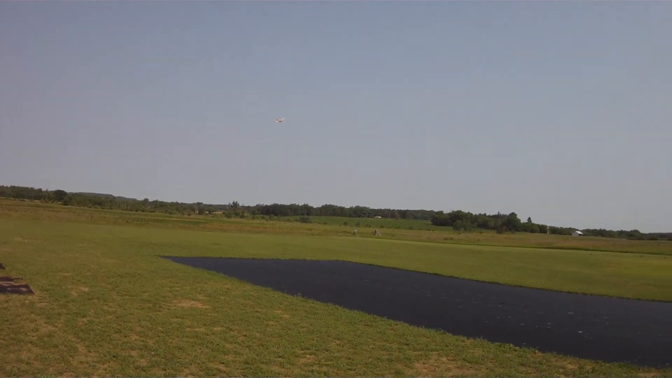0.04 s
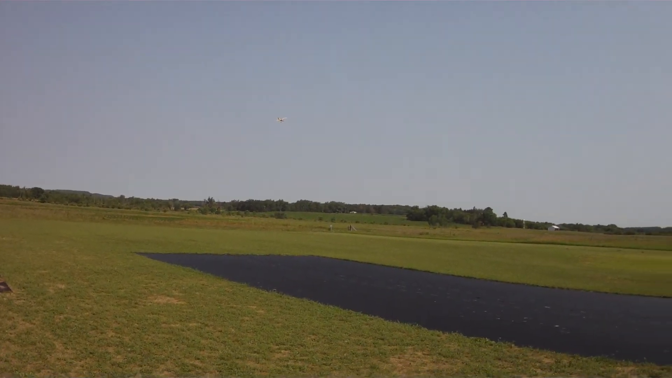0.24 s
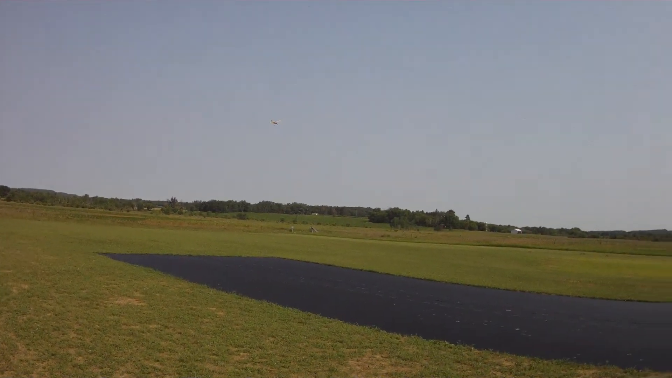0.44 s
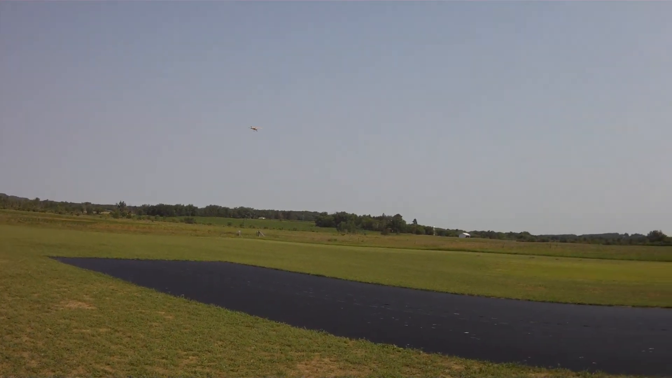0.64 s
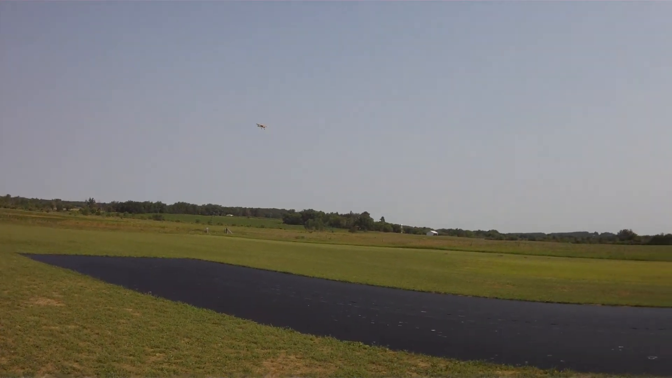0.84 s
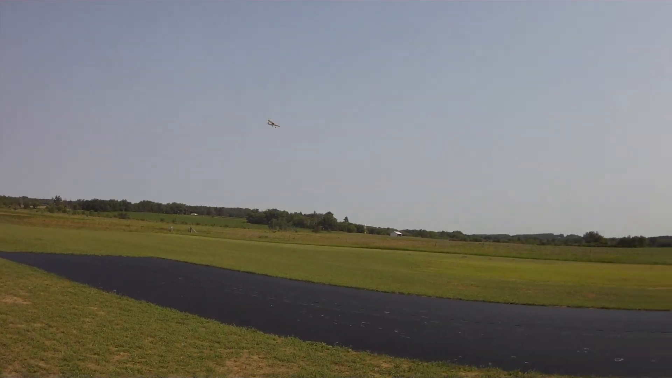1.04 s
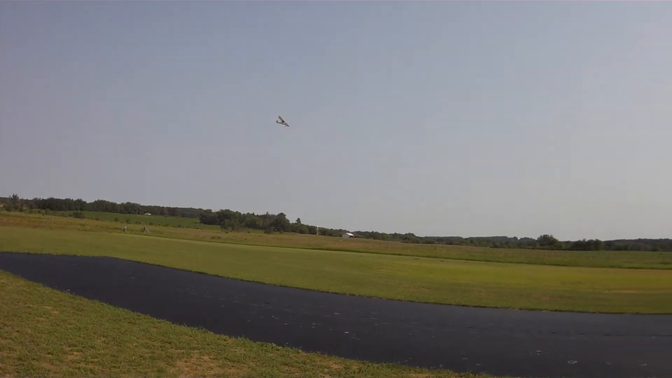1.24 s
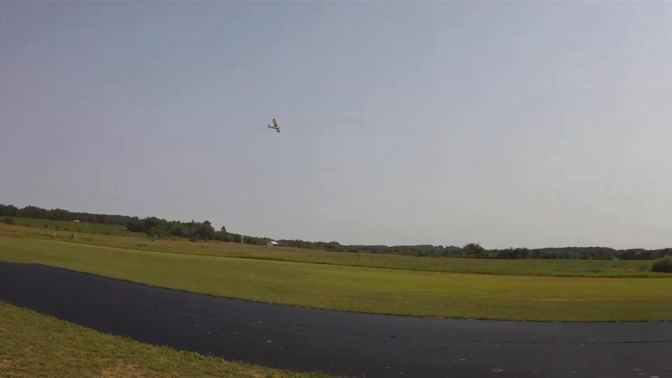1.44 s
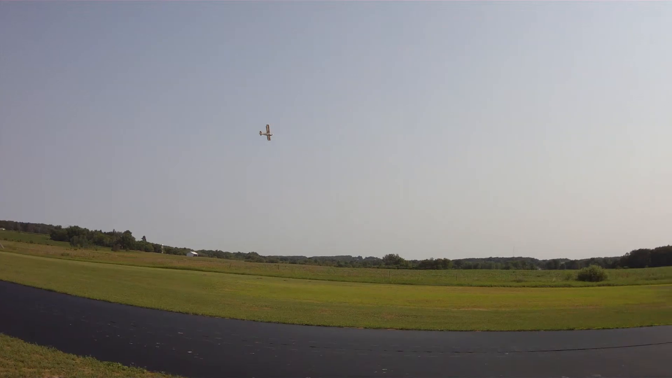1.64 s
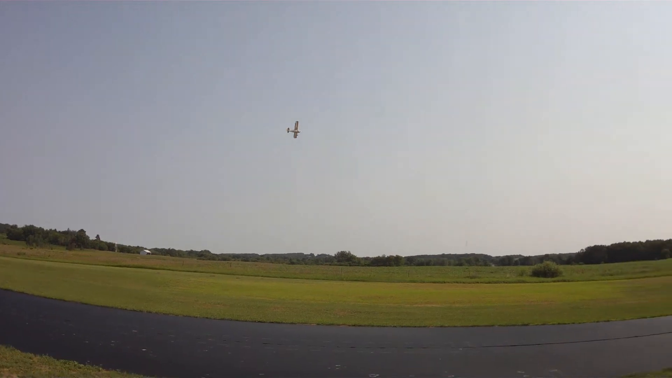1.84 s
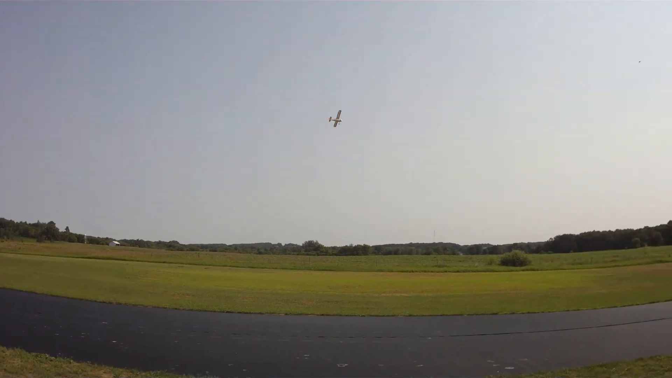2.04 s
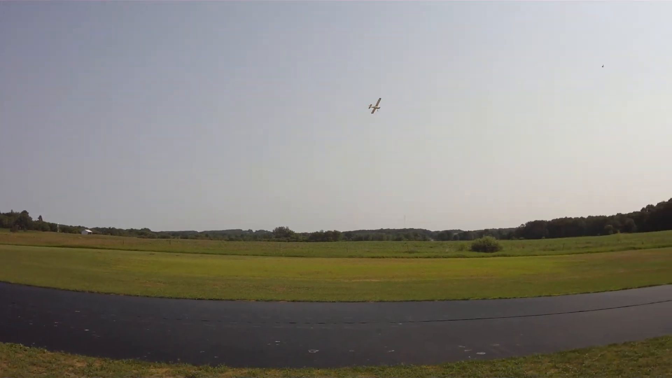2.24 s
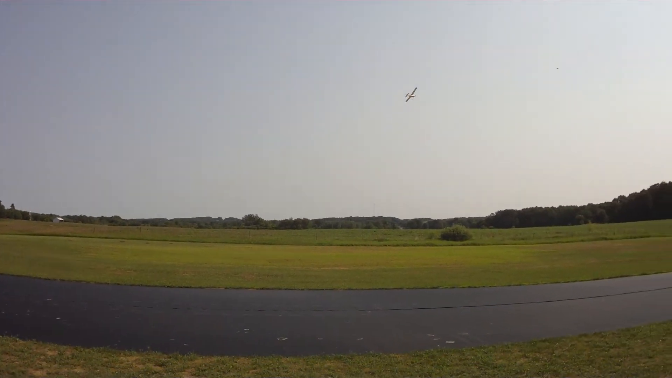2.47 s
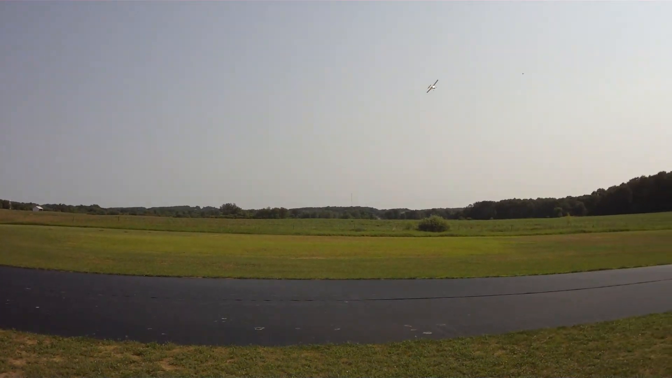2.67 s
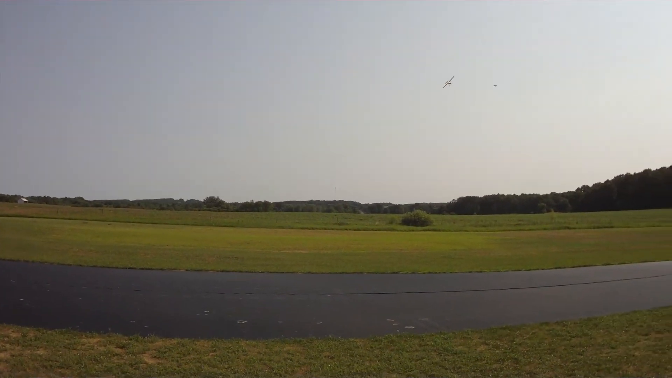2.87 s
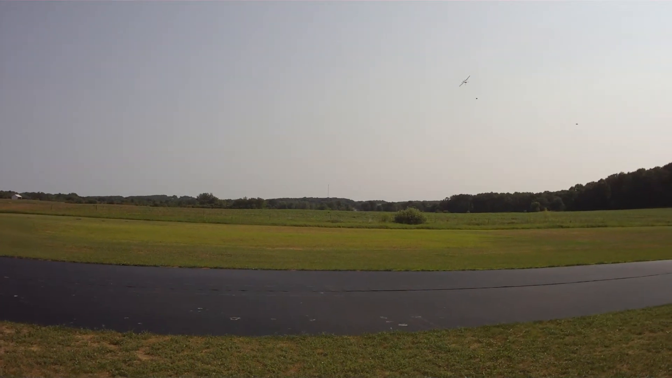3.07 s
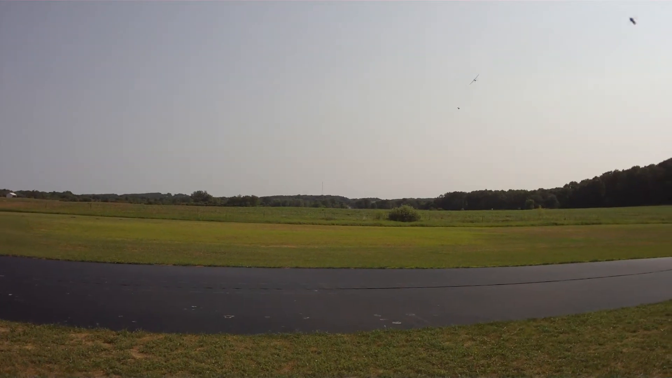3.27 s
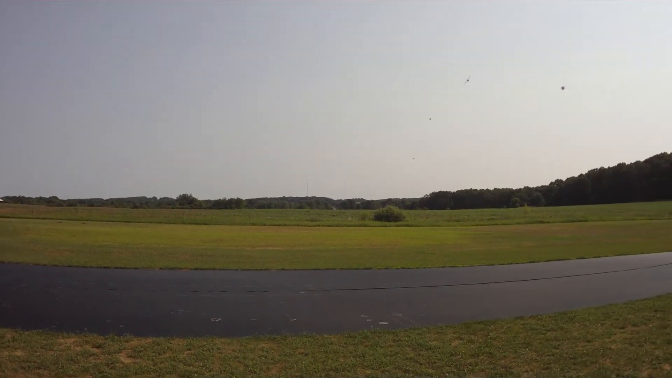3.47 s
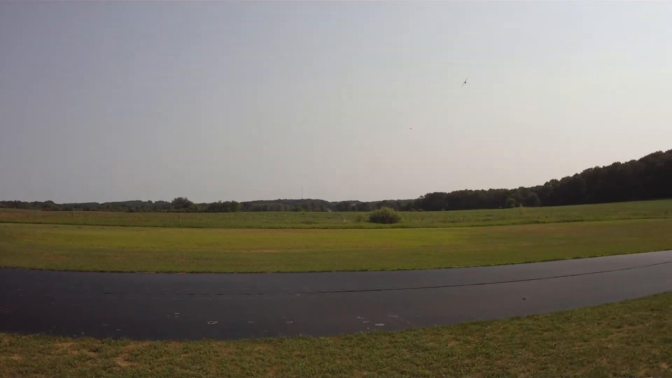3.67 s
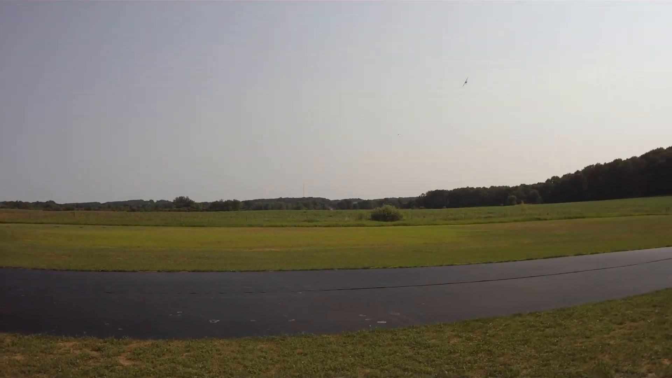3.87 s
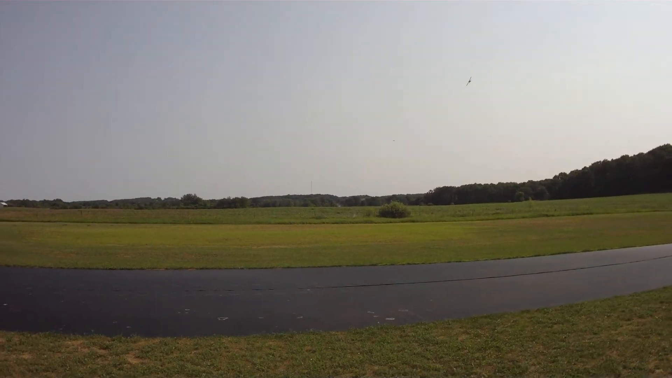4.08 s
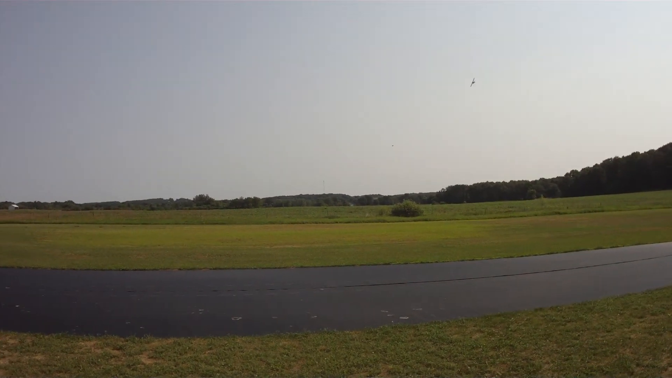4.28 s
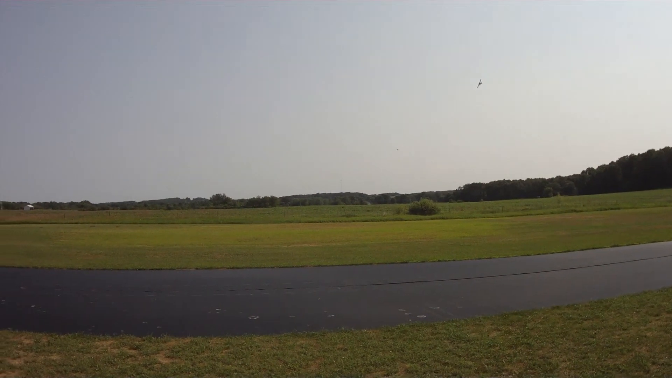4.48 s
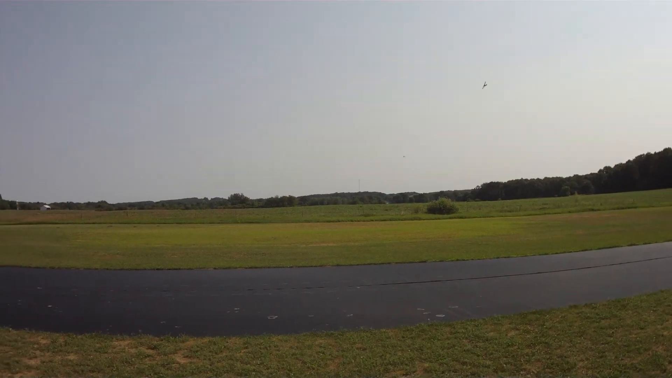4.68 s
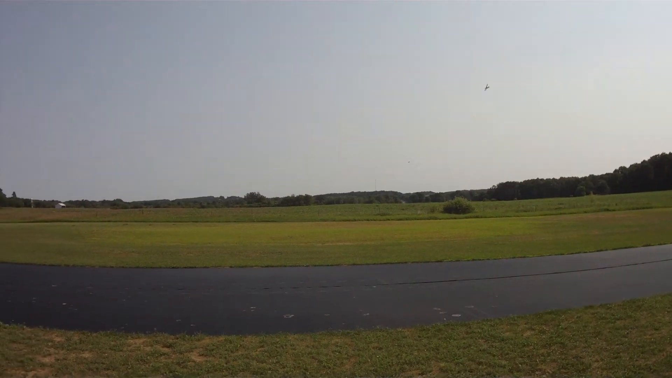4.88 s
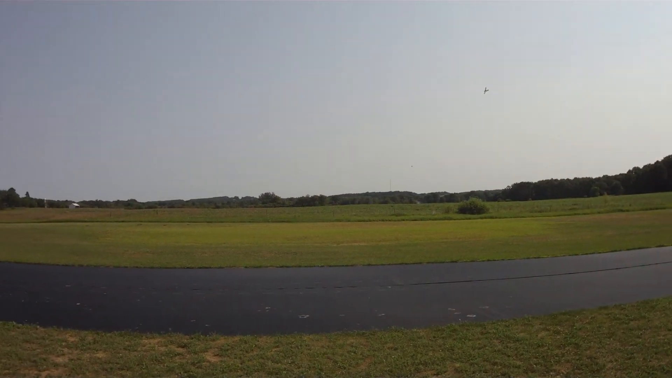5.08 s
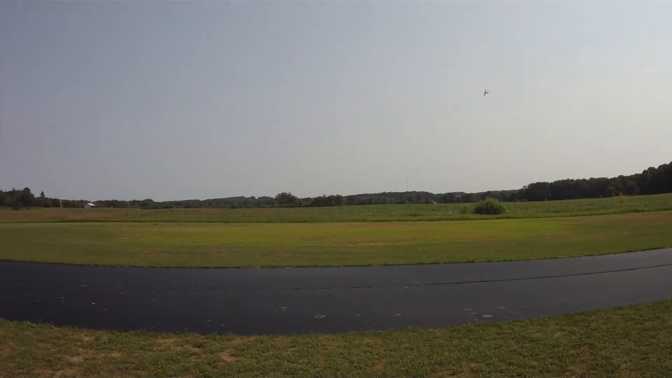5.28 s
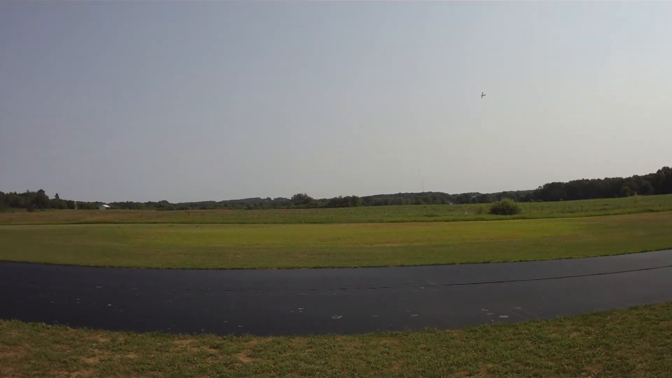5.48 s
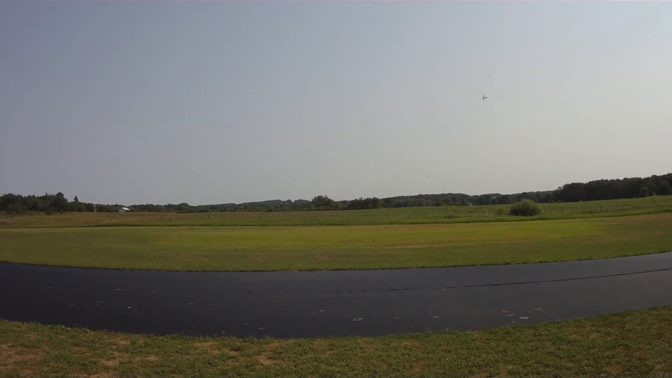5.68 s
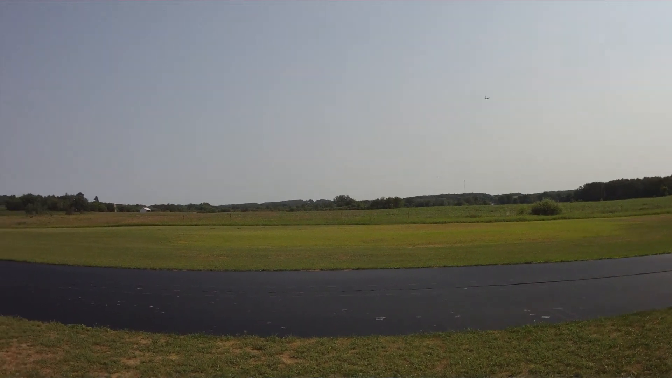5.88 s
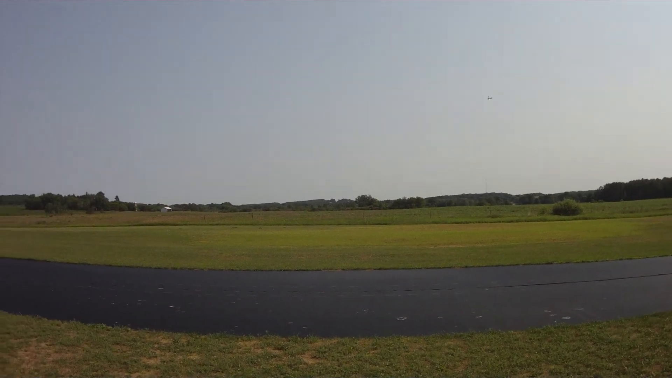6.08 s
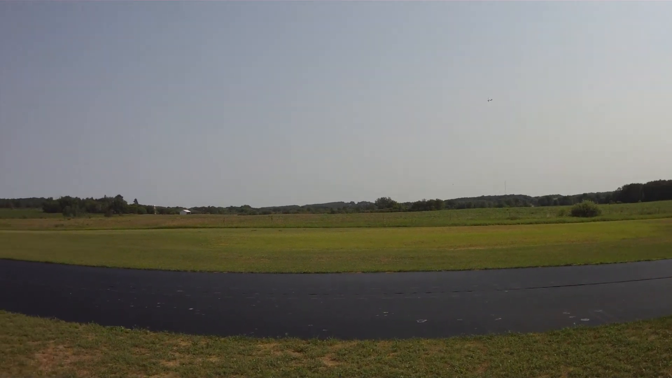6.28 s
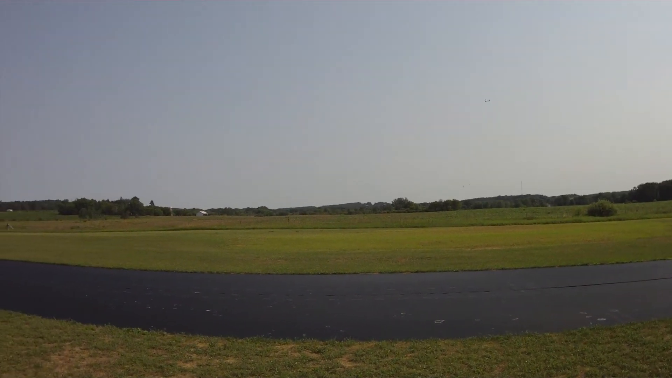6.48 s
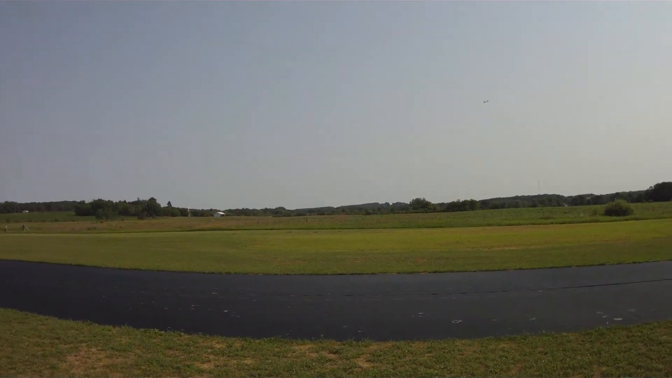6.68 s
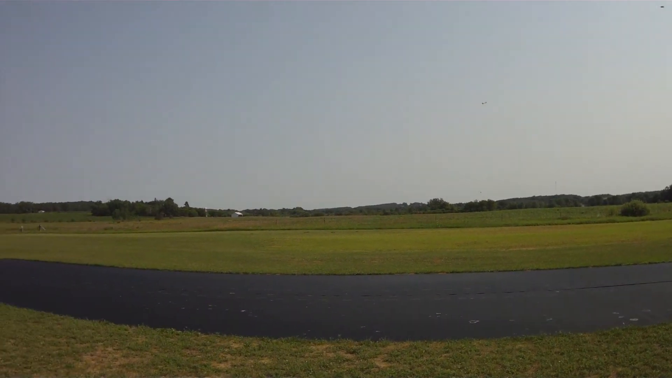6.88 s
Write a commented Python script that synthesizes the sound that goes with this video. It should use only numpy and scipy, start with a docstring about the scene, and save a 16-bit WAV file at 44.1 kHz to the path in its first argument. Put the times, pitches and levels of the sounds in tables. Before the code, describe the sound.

Rough sputtering model airplane drone rises in pitch and loudness, peaks bright and buzzy, then recedes over a breezy field with wind bumps and faint birds.

```python
"""A model airplane's two-stroke glow engine starts rich and stumbling, with a few bird notes over a breezy meadow.
It cleans up at full throttle and swells, pulses driving a muffler and a bright rasp over propeller tone and wash.
The note peaks, then drops as the plane banks away, coloured throughout by a moving echo off the ground.
Later, puffs and sharp eddies of wind crowd the microphone and bent whistles of birds return."""
import sys
import numpy as np
from scipy import signal
from scipy.fft import rfft, irfft
from scipy.io import wavfile
from scipy.ndimage import map_coordinates

SR = 44100
rng = np.random.default_rng(int(sys.argv[2]) if len(sys.argv) > 2 else 0)


def wav_out(sig):
    """Save sig, one row per channel (or a flat mono array), as 16-bit PCM at SR to the path in sys.argv[1]."""
    wavfile.write(sys.argv[1], SR, np.round(np.clip(np.atleast_2d(sig).T, -1, 1) * 32767).astype(np.int16))


N = 305172
TIME = np.arange(N) / SR


def amp(db):
    """Decibels to gain."""
    return 10 ** (np.asarray(db) / 20)


def evened(x):
    """Scales to rms 1."""
    return x / np.sqrt(np.mean(x ** 2) + 1e-20)


def curves(rows):
    """The columns of a table, joined by straight lines in time."""
    s, *columns = np.transpose(rows)
    return [np.interp(TIME, s, column) for column in columns]


def drift(rate_hz):
    """Random wander of rms 1, its spectrum fading smoothly above rate_hz."""
    hz = np.fft.rfftfreq(N, 1 / SR)
    spectrum = rfft(rng.standard_normal(N)) * np.exp(-(hz / rate_hz) ** 2)
    return evened(irfft(spectrum * (hz > 0), N))


def colour(x, spectrum, size=2048):
    """Causal minimum-phase filter with the given (f/Hz, level/dB) shape."""
    f, db = np.transpose(spectrum)
    hz = abs(np.fft.fftfreq(size, 1 / SR))
    log_gain = np.log(amp(np.interp(np.log(hz + 1), np.log(f), db)))
    taps = np.fft.ifft(np.exp(np.conj(signal.hilbert(log_gain)))).real
    return signal.oaconvolve(x, taps[:size // 2])[:N]


def at_level(x, db, size=4001):
    """Rides a sound to the running rms level db."""
    window = signal.windows.hann(size)
    power = signal.oaconvolve(x ** 2, window / window.sum(), "same")
    return x * amp(db) / np.sqrt(abs(power) + 1e-12)


def swells(rows):
    """Gain of bell-shaped swells, each (t/s, half width/s, level/dB); their powers add."""
    powers = (amp(2 * db) * np.exp(-2 * ((TIME - s) / width) ** 2) for s, width, db in rows)
    return np.sqrt(sum(powers))


def resonate(x, hz, width_hz):
    """A resonance of gain 1 that follows the curve hz, made by shifting it down to a one-pole low-pass."""
    turn = np.exp(2j * np.pi * np.cumsum(hz) / SR)
    r = np.exp(-np.pi * width_hz / SR)
    return 2 * (turn * signal.lfilter([1 - r], [1, -r], x / turn)).real


IDLE_HZ, CLEAN_HZ = 159, 177  # firing rates where the mixture is fully rich, and where it has cleaned up


def richness(speed_hz):
    """Fuel mixture: 1 at idle, 0 once the engine has cleaned up."""
    return np.clip((CLEAN_HZ - speed_hz) / (CLEAN_HZ - IDLE_HZ), 0, 1)


# Missed firings: t/s, loss level/dB
MISSED_FIRINGS = [(.074, 5), (.152, 6), (.519, 5), (.526, 5), (.533, 12), (.688, 1), (.84, 7), (.962, 2),
                  (1.062, 4)]
RICH_DB, LEAN_DB = 7, -0.5  # extra loss of a weak firing at full richness, and its loss once clean


def firings(turns, speed_hz, uneven_db, jitter):
    """Strength of the current firing, and the phase in turns from its crack; rich charges burn unevenly."""
    number = np.round(turns).astype(int)
    when = np.interp(np.arange(number[-1] + 1), turns, TIME)
    scatter, late, skip = rng.standard_normal((len(when), 3)).T
    # about every third charge is a weak one
    weak = np.zeros(len(when))
    at = np.cumsum(3 + (skip > 1) - (skip < -1))
    weak[at[at < len(when)]] = 1
    rich = richness(np.interp(when, TIME, speed_hz))
    db = uneven_db * scatter - weak * (LEAN_DB + RICH_DB * rich)
    for s, loss_db in MISSED_FIRINGS:
        db[np.argmin(abs(when - s))] = -loss_db
    return amp(db)[number], turns - number + jitter * late[number]


def blast(strength, phase, rough, puff=1.0, count=72):
    """One sharp pulse a firing (count harmonics), and turbulent gas behind it that decays over puff turns."""
    crack = np.sinc((2 * count + 1) * phase) / np.sinc(phase)
    gas = (0.76 + np.exp(-(phase % 1) / puff)) * rng.standard_normal(N)
    return strength * (evened(crack) + rough * evened(gas))


# Echo off the field, its delay shrinking overall as the plane sinks to the horizon:
# t/s, delay/ms, strength (0-1)
GROUND_ECHO = [(0, 2.35, 0.83), (.7, 2.13, 0.5), (1.05, 2.45, 0.46), (1.42, 2.35, 0.49), (1.75, 2.13, 0.52),
               (2.1, 2.04, 0.41), (2.9, 2.06, 0.7), (3.4, 2.19, 0.75), (3.85, 2.11, 0.4), (4.2, 1.9, 0.42),
               (4.85, 1.6, 0.67), (5.6, 1.54, 0.18), (6.0, 1.37, .55), (6.5, 1.26, 0.19),
               (6.92, 1.28, 0.33)]


def ground(x, grass):
    """Adds the late copy that bounces off the field, combing the tone; grass is the share that survives."""
    delay_ms, strength = curves(GROUND_ECHO)
    late = map_coordinates(x, [np.arange(N) - delay_ms * SR / 1000], order=3)
    return x + grass * np.clip(strength, 0, .95) * late


# Ride of the plane as it nears, banks and leaves, before small trims:
# t/s, exhaust level/dB, propeller tone level/dB, upper edge of the exhaust note level/dB
PASS_LEVELS = [(0.04, -40.5, -66, -66.5), (0.46, -41, -62.5, -57.5), (0.59, -40.5, -68, -63),
               (0.88, -37, -53, -65), (1.11, -35.5, -59.5, -55), (1.47, -33, -46.5, -50.5),
               (1.62, -32.5, -46, -51.5), (2.45, -29.5, -41, -47.5), (2.6, -30, -43, -46),
               (3.02, -34.5, -45, -47), (3.1, -35.5, -46.5, -50), (3.57, -40, -46.5, -57),
               (3.88, -44.5, -48.5, -62.5), (4.66, -48, -43, -62), (5.16, -50, -43, -56.5),
               (5.43, -43, -44, -59.5), (5.75, -42.5, -43.5, -68.5), (6.9, -48, -51, -55.5)]
# Tone beamed this way as the plane turns:
# t/s, strongest exhaust f/Hz, brightest rasp lobe f/Hz, rasp level/dB relative to the exhaust
BEAMING = [(0, 674, 3830, -24.5), (.7, 684, 4100, -21.5), (1.1, 1235, 4840, -21.5),
           (1.85, 1605, 4850, -19.5), (2.45, 1117, 4072, -25), (2.8, 1100, 5000, -25.5),
           (3.35, 1290, 6254, -20), (3.75, 1100, 3270, -25.5), (4.9, 1088, 3600, -18),
           (5.4, 1320, 4000, -25), (5.8, 926, 4400, -24), (6.92, 838, 3640, -18)]
# One exhaust pulse through the muffler: f/Hz, level/dB
MUFFLER_COLOUR = [(100, -59.5), (170, -2), (200, -10.5), (330, -11), (470, 5), (600, 7), (800, 11),
                  (1000, 12.5), (1200, 11.5), (1400, 11), (1600, 10.5), (1850, 4.5), (2050, -0.5),
                  (2350, -6), (2750, -20), (4000, -52.5)]
# Air churned by the propeller: f/Hz, level/dB
PROPELLER_WASH = [(100, -29), (300, -2.5), (600, 8.5), (1100, 7.5), (1600, -13.5), (2200, -1), (3000, -3.5),
                  (6000, -20)]


def drone(turns, strength, phase):
    """Exhaust pulses through the muffler, the tone of two blades passing each turn, and their wash."""
    exhaust_db, propeller_db, edge_db = curves(PASS_LEVELS)
    pulses = blast(strength, phase, rough=.1)
    pipe = ground(colour(pulses, MUFFLER_COLOUR), grass=1.0)
    pipe = pipe + 0.87 * resonate(pipe, curves(BEAMING)[0], width_hz=200)
    # the long waves spread evenly, the short ones are beamed
    low = signal.sosfiltfilt(signal.butter(8, 2100, fs=SR, output="sos"), pipe)
    body = at_level(low, exhaust_db + 0.24)
    edge = at_level(pipe - low, edge_db - .3)
    # lift the second harmonic out of the exhaust: the propeller rules it
    second = np.exp(4j * np.pi * turns)
    narrow = signal.butter(2, 25, fs=SR, output="sos")
    hum = 2 * (second * signal.sosfiltfilt(narrow, body / second)).real
    propeller = amp(propeller_db + 3.0) * second.real  # +3 dB: rms to peak
    wash = amp(exhaust_db - 21) * evened(colour(rng.standard_normal(N), PROPELLER_WASH))
    restless_air = amp(0.77 * drift(10.5))
    return (propeller + body - hum + edge + wash) * restless_air


def airframe(x, ring_ms=3.3, scatter=1.0, size=300):
    """Wings and fuselage scatter part of the treble; the pattern changes as the plane banks."""
    fade = np.exp(-np.arange(size) * 1000 / SR / ring_ms)
    bank = 2.1 * TIME  # radians
    a, b = (signal.oaconvolve(x, rng.standard_normal(size) * fade / np.linalg.norm(fade))[:N]
            for _ in range(2))
    return x + scatter * (a * np.cos(bank) + b * np.sin(bank))


# The sharp front of each pulse: f/Hz, level/dB
RASP_COLOUR = [(1500, -47), (2400, -1.5), (2800, -4), (3150, -3), (3380, -1), (3600, -5.5), (4000, -1),
               (4600, -6), (5400, -7.5), (6600, -10.5), (8000, -19), (10000, -34), (15000, -37)]
# The finest hiss of each pulse: f/Hz, level/dB
SIZZLE_COLOUR = [(6000, -48), (8000, -6), (10500, -4), (13000, -10), (14200, -24)]
# Sizzle flaring as the exhaust outlet swings past the listener: t/s, half width/s, level/dB
SIZZLE_FLARES = [(1.36, 0.32, -62.5), (2.13, 0.48, -56.5), (3.4, 0.11, -70)]


def buzz(strength, phase):
    """The bright fronts of the pulses, scattered and beamed; restless air makes the treble twinkle."""
    exhaust_db = curves(PASS_LEVELS)[0]
    _, lobe_hz, rasp_db = curves(BEAMING)
    rasp = airframe(colour(blast(strength, phase, rough=0.71), RASP_COLOUR))
    rasp = rasp + 1.1 * resonate(rasp, lobe_hz, width_hz=960)
    rasp = at_level(rasp, exhaust_db + rasp_db)
    sizzle_db = 20 * np.log10(swells(SIZZLE_FLARES) + 1e-9)
    sizzle = ground(colour(blast(strength, phase, rough=0.2), SIZZLE_COLOUR), grass=0.61)
    sizzle = at_level(sizzle, sizzle_db)
    return rasp * amp(1.0 * drift(15)) + sizzle * amp(1.0 * drift(16))


# Firing rate as heard, one firing a turn: t/s, f/Hz
ENGINE_SPEED = [(0.0, 155.8), (0.29, 158.7), (0.42, 165.9), (0.6, 155.2), (0.71, 160.4), (0.89, 172.1),
                (1.35, 200.4), (1.43, 202.7), (1.77, 204.6), (2.16, 200.8), (3.27, 195.4), (3.93, 195.1),
                (4.97, 199.6), (5.86, 204.6), (6.01, 202.4), (6.21, 195), (6.57, 196.9), (6.92, 193.9)]
THROTTLE_WAVER = 0.0019  # rms share by which the speed hunts at CLEAN_HZ and below
FULL_HZ = 189  # firing rate above which the hunting stops


def airplane():
    """One crankshaft times the pulses and the propeller; it hunts a little while the throttle opens."""
    speed_hz, = curves(ENGINE_SPEED)
    opening = np.clip((FULL_HZ - speed_hz) / (FULL_HZ - CLEAN_HZ), 0, 1)
    waver = 1 + 0.00041 * drift(23) + THROTTLE_WAVER * opening * drift(11.9)
    turns = np.cumsum(speed_hz * waver) / SR
    strength, phase = firings(turns, speed_hz, uneven_db=0.84, jitter=0.0019)
    return drone(turns, strength, phase) + buzz(strength, phase)


# Still air over the meadow: f/Hz, level/dB
AIR_COLOUR = [(20, -14), (60, -13), (150, -41.5), (400, -10.5), (1000, -1.5), (2000, -6), (3000, -12),
              (4800, -18.5), (6500, -26), (8000, -35), (15500, -44.5)]


def meadow(level_db=-56, hiss_db=-66.5):
    """Open air as gently drifting coloured noise, and the thin high-passed hiss of the microphone."""
    air = amp(level_db + .5 * drift(4.4)) * evened(colour(rng.standard_normal(N), AIR_COLOUR))
    hiss = signal.lfilter(*signal.butter(3, 11000, "high", fs=SR), rng.standard_normal(N))
    return air + amp(hiss_db) * evened(hiss)


# Puffs of wind on the microphone, before the overall wind gain: peak t/s, half width/s, level/dB
WIND_PUFFS = [(.27, 0.032, -57), (.49, .03, -61), (1.58, .02, -61), (2.23, 0.011, -55), (2.87, .02, -48),
              (2.97, 0.069, -50.5), (3.22, .025, -61), (3.535, 0.019, -54), (4.03, 0.067, -55),
              (4.18, 0.026, -50.5), (4.6, 0.1, -55.5), (4.8, .035, -54), (5.03, 0.22, -58),
              (5.86, 0.084, -51.5), (6.06, 0.023, -53), (6.37, 0.13, -53.5), (6.58, 0.15, -57),
              (6.77, 0.042, -55)]
# Colour of the wind on the microphone: f/Hz, level/dB
WIND_COLOUR = [(20, -20), (60, 0), (130, 1.5), (220, 0), (330, -2), (500, -6.5), (900, -4.5), (2000, -82)]
# Single eddies hitting the microphone: t/s, peak level/dB, half width/ms
WIND_EDDIES = [(2.871, -37, 1.3), (2.946, -31, 0.43), (2.991, -31, 0.65), (3.027, -35.5, 1.1),
               (3.534, -25.5, 0.51), (3.542, -21.5, 0.54), (4.169, -40, 0.82), (4.785, -34, 0.76),
               (5.774, -25, .75), (5.83, -32, 1.04), (5.899, -30, 0.79), (6.331, -30, 0.8),
               (6.38, -34, 0.99), (6.75, -38, 1.08)]
BREEZE_DB, BREEZE_SWING_DB = -65.5, 1  # light air between the puffs, before the overall wind gain


def wind(level_db=5.0, lumpy_db=1.0):
    """Lumpy buffeting in puffs over a light breeze; each large eddy is one push and pull on the diaphragm."""
    breeze = amp(BREEZE_DB + BREEZE_SWING_DB * drift(9.8))
    force = np.hypot(swells(WIND_PUFFS), breeze)
    lumps = rng.standard_normal(N) * amp(lumpy_db * drift(51))
    out = force * amp(level_db) * evened(colour(lumps, WIND_COLOUR))
    for s, db, width_ms in WIND_EDDIES:
        u = (TIME - s) * 1000 / width_ms
        near = abs(u) < 10
        out[near] -= amp(db) * u[near] * np.exp((1 - u[near] ** 2) / 2)
    return out


# Single bird notes, before the overall gain: t/s, length/s, start f/Hz, middle f/Hz, end f/Hz, level/dB
BIRD_NOTES = [(.257, 0.04, 3520, 3100, 2850, -58.5), (0.359, 0.024, 3500, 4060, 4460, -53),
              (0.363, 0.014, 2400, 2630, 2830, -55), (0.39, 0.039, 3470, 3050, 2920, -57.5),
              (3.997, 0.029, 4048, 3230, 2950, -63), (4.031, 0.11, 2900, 2730, 2810, -60.5),
              (4.216, 0.061, 5150, 5050, 5300, -68), (4.332, .1, 4050, 3570, 3580, -56.5),
              (4.65, 0.035, 4970, 4700, 4670, -66), (4.66, 0.038, 3760, 3780, 3700, -63),
              (4.811, 0.3, 3890, 3200, 3520, -60.5), (5.259, 0.13, 4240, 3200, 2540, -59),
              (5.402, 0.21, 2520, 2780, 3600, -60.5), (5.755, 0.048, 4830, 4700, 4900, -63),
              (5.882, 0.056, 2990, 2260, 2090, -57.5)]
# One twittered phrase: t/s from its main stroke, length/s, start f/Hz, middle f/Hz, end f/Hz,
# level/dB relative to its repeat
TWITTER_PHRASE = [(-.057, 0.02356, 4650, 5400, 5000, -11), (-.024, .028, 4380, 4460, 5230, -12),
                  (0, 0.013, 5160, 4260, 3600, -2.5), (.019, .026, 3680, 3580, 3650, -4.5),
                  (0.022, .013, 4950, 4180, 3700, -6)]
# Repeats of the phrase, before the overall gain: t/s, level/dB
TWITTER_REPEATS = [(.603, -55.5), (.768, -51.5), (.933, -53)]


def birds(level_db, waver, flutter_db):
    """Thin sine whistles, each bending through three pitches, with a fast waver and flutter."""
    out = np.zeros(N)
    wobble, flutter = 1 + waver * drift(150), amp(flutter_db * drift(140))
    twitters = [(at + s, *shape, loud_db + db)
                for at, loud_db in TWITTER_REPEATS for s, *shape, db in TWITTER_PHRASE]
    for s, length, start_hz, middle_hz, end_hz, db in BIRD_NOTES + twitters:
        now = (TIME >= s) & (TIME < s + length)
        u = (TIME[now] - s) / length
        bend = np.polyfit([0, .5, 1], [start_hz, middle_hz, end_hz], 2)
        hz = np.polyval(bend, u) * wobble[now]
        whistle = np.sin(2 * np.pi * np.cumsum(hz) / SR)
        out[now] += amp(db) * np.sqrt(np.sin(np.pi * u)) * whistle
    return amp(level_db) * flutter * out


def treeline(x, t60=1.0, dull_hz=2500):
    """Dull scatter from the meadow and far trees: a slow-rising noise tail that fades 60 dB in t60 s."""
    t = TIME[:SR]
    tail = rng.standard_normal(SR) * amp(-60 * t / t60) * (1 - np.exp(-t / 0.1))
    dull = signal.butter(1, min(dull_hz, SR / 4), fs=SR)
    tail = signal.lfilter(*dull, tail / np.linalg.norm(tail))
    return signal.oaconvolve(x, tail)[:N]


def scene():
    """Plane, open air, wind, birds and their scatter at one microphone."""
    plane, background, gusts = airplane(), meadow(), wind()
    song = birds(level_db=3.5, waver=0.0082, flutter_db=1.5)
    scattered = treeline(amp(-19) * plane + amp(-4.5) * song)
    return (plane + background + gusts + song + scattered)[None]


PORT_NOTCH_HZ, EDGE_HZ = 9050, 15400  # treble band cancelled by the port, and upper band limit


def record(dry, notch_width_hz=2600):
    """The microphone port cancels one treble band; then a steep low-pass limits the band."""
    notch = signal.iirnotch(PORT_NOTCH_HZ, PORT_NOTCH_HZ / notch_width_hz, fs=SR)
    ported = signal.lfilter(*notch, dry)
    low_pass = signal.firwin(511, EDGE_HZ, window=("kaiser", 9), fs=SR)
    return signal.oaconvolve(ported, low_pass[None], "same")


dry = scene()
out = record(dry)
wav_out(out)
```